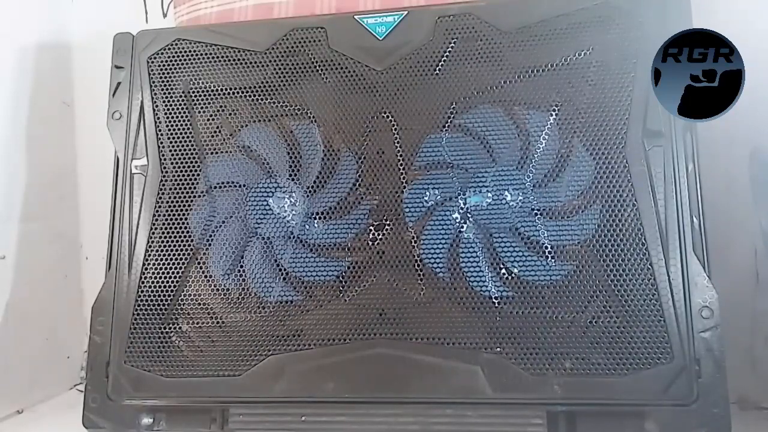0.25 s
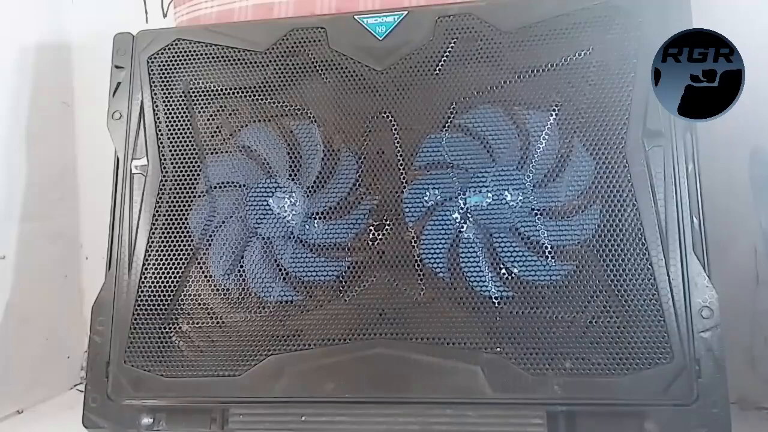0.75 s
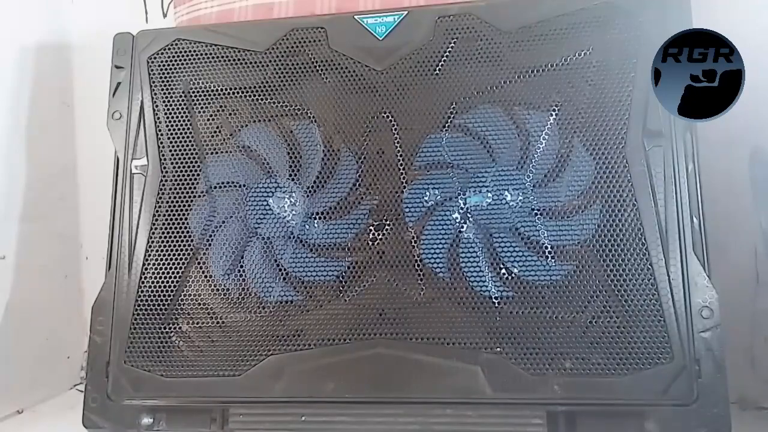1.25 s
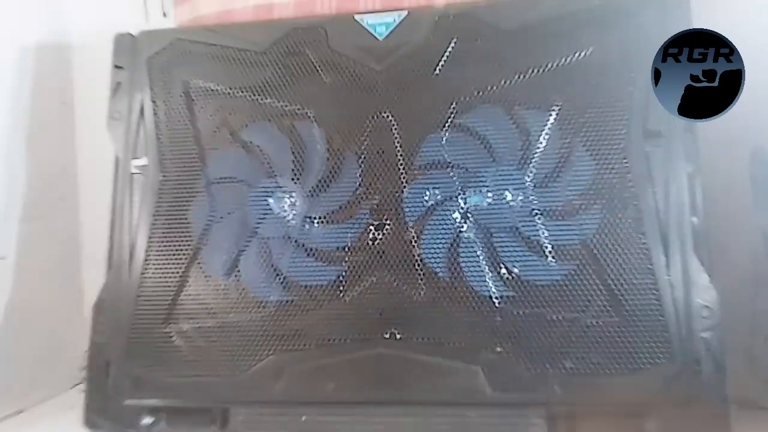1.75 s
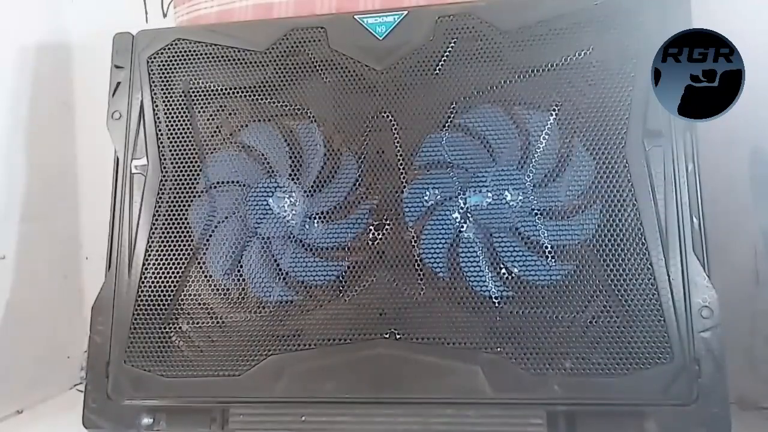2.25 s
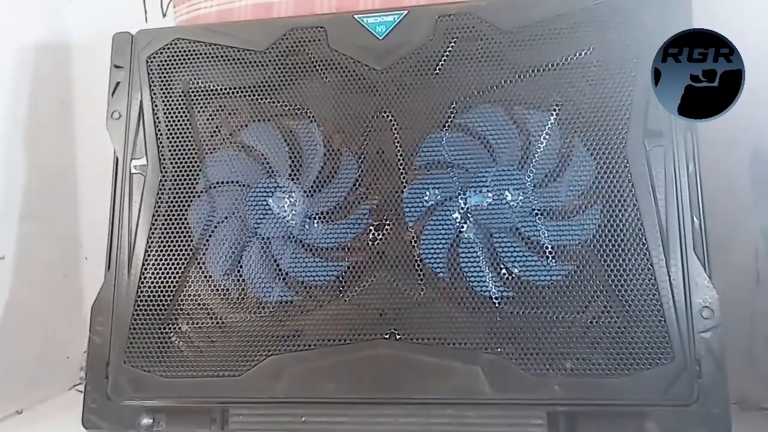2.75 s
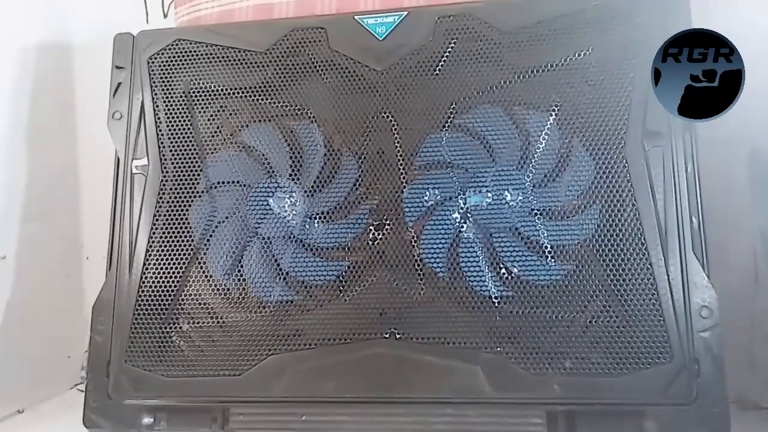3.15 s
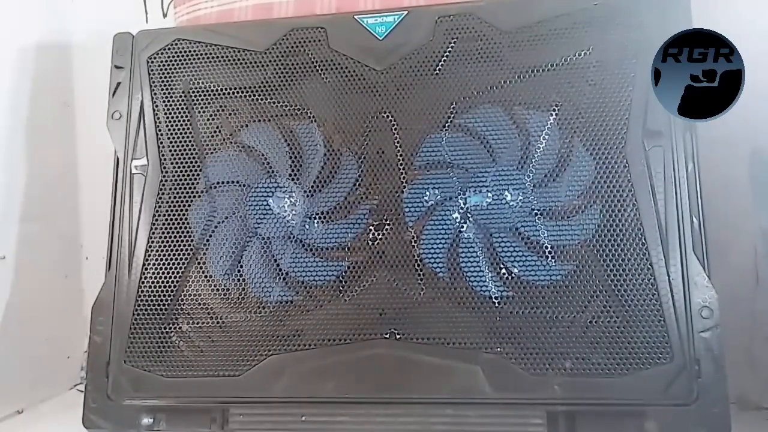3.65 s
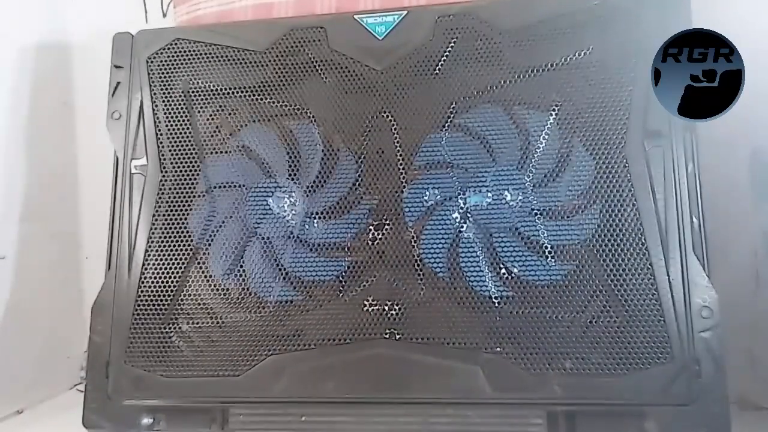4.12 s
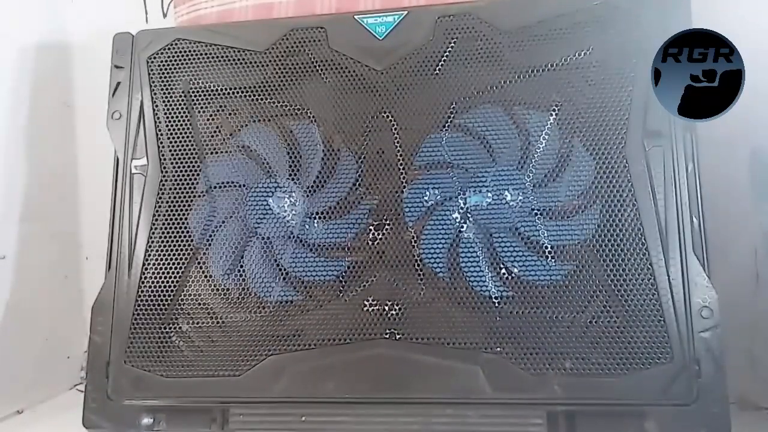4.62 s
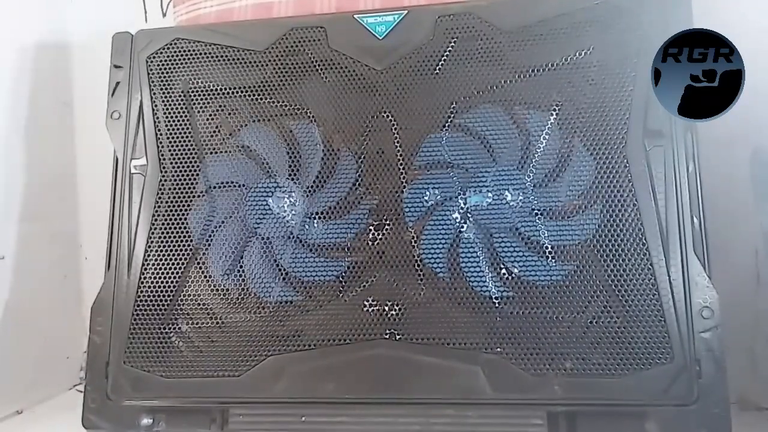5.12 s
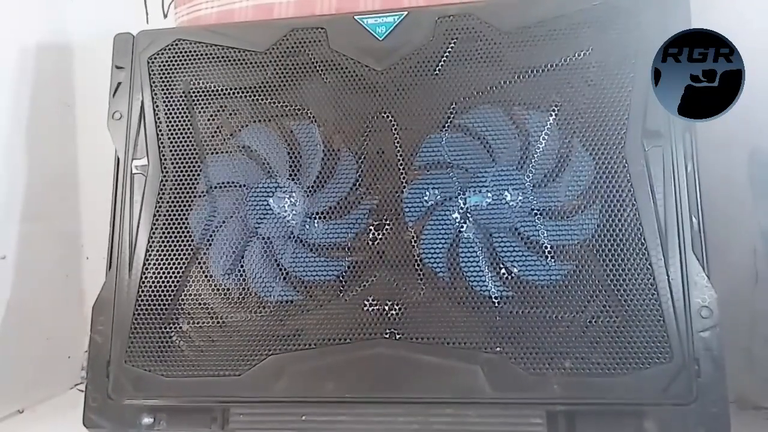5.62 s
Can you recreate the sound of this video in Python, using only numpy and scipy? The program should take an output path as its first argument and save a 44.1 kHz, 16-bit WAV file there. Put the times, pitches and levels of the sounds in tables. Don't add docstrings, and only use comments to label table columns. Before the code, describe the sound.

A bare, hard indoor room heard through a close phone microphone: soft low air, hiss and a faint, buzzing high electronic whine. Tiny handling ticks come at 0.8 and 1.3 s. At 1.65 s, just after a small hammer tick, a gas pellet rifle fires two shots about 0.07 s apart, each a harsh blast followed instantly by a strike ringing steel mesh, overloading the microphone with wind thumps. Loud rebounds crack at 1.9-2.0 s; pellets skip and rattle over the panel until 2.7 s, some sharply near 2.35 s, while it rocks with low knocks. Small bounces fade by 3.3 s. A tick at 3.8 s precedes a second double shot at 3.95 s, duller in its ring. Pellets click brightly on tile at 4.37 s, knock hollowly on a wooden shelf at 4.35 and 4.47 s, then bounce and skitter on tiles from 4.75 s, gradually weakening to the end, with short bright echoes.

```python
import sys
import numpy as np
from scipy import signal
from scipy.fft import rfft, irfft, next_fast_len
from scipy.io import wavfile

SR = 44100
rng = np.random.default_rng(int(sys.argv[2]) if len(sys.argv) > 2 else 0)


def generate_wav(signal):
    frames = np.transpose(np.atleast_2d(signal))
    scaled = np.clip(frames, -1, 1) * 32767
    pcm = np.round(scaled).astype(np.int16)
    wavfile.write(sys.argv[1], SR, pcm)


def rack_gain(trim_db):
    fader = np.asarray(trim_db, float)
    return 10 ** (fader / 20)


N = 259263

# t/s, strength/dB, hammer tick level/dB
TRIGGER_PULLS = [
    (1.653, -3.5, -23),
    (3.946, -3, -16.5),
]
# f/Hz, width/Hz, level/dB
PANEL_RINGS = [(200, 58, -7.5), (493, 230, -1), (757, 240, 4.5), (1010, 460, 2.5), (1550, 300, 1.5),
               (2430, 680, -3)]
# f/Hz, width/Hz, level/dB
FLOOR_RINGS = [(170, 107, -4), (418, 142, 9), (786, 305, 11.5), (1340, 350, 17.5), (2060, 1270, -3)]
# f/Hz, level/dB
TILE_CRACK = [(200, -16), (700, -12.5), (1800, -4.5), (3500, -2.5), (6000, -2.5), (8000, -3.5),
              (10000, -12.5), (16000, -31.5)]


def unit(x):
    return x / np.sqrt(np.mean(x ** 2) + 1e-20)


def along(points, hz):
    f, v = np.transpose(points)
    return np.interp(np.log(hz + 1), np.log(f + 1), v)


def curves(rows, **ends):
    s, *cols = np.transpose(rows)
    return [np.interp(np.arange(N) / SR, s, c, **ends) for c in cols]


def causal(points, size):
    level = rack_gain(along(points, np.fft.rfftfreq(size, 1 / SR)))
    ceps = irfft(np.log(level + 1e-6), size)
    ceps[1:size // 2] *= 2
    ceps[size // 2 + 1:] = 0
    return np.exp(rfft(ceps))


def coloured(x, points):
    m = next_fast_len(len(x) + 8192)
    return irfft(rfft(x, m) * causal(points, size=m), m)[:len(x)]


def resonances(modes, f, count, scatter_db):
    strength = rack_gain(scatter_db * rng.standard_normal((count, len(modes), 1)))
    total = 0
    for k, (hz, width, db) in enumerate(modes):
        ring = rack_gain(db) * 1j * f * width / (hz * hz - f * f + 1j * f * width)
        total = total + (-1) ** k * strength[:, k] * ring
    return total


def tails(count, size):
    # f/Hz, time to fall 60 dB t/s
    decay = [(150, 0.26), (700, 0.64), (2500, 0.52), (6000, 0.48), (8500, 0.36), (11000, 0.48),
             (15000, 0.59)]
    hz, t, z = signal.stft(rng.standard_normal((count, size)), SR, nperseg=256)
    fading = z * rack_gain(-60 * t / along(decay, hz)[:, None])
    tail = signal.istft(fading, SR, nperseg=256)[1][:, :size]
    t = np.arange(size) / SR
    tail = tail * (1 - np.exp(-t / 0.004)) ** 2
    return tail / np.linalg.norm(tail, axis=1, keepdims=True)


def contacts(rows, room_db, drier, rattle_ms, longer, body_db=0, top_db=0, late_s=0):
    rows = np.array(rows)[:, :4] + [late_s, 0, body_db, top_db]
    loud_db = np.maximum(rows[:, 1], rows[:, 2]) + 15
    return np.c_[rows, room_db - drier * loud_db, rattle_ms * rack_gain(longer * (rows[:, 1] + 15))]


def hits(rows, rings, click_ms, scatter_db, ring_db, body_room_db, top_room_db,
         crack=None, spot_hz=3000, spot_db=-40):
    # f/Hz, level/dB
    mic_tone = [(40, -18), (150, 1), (600, -5.5), (2500, -2.5), (4500, -1), (6000, 0.5), (7200, -4),
                (8600, -12.5), (12000, -18.5), (16000, -45)]
    # f/Hz, width/Hz, level/dB
    mesh_rings = [(2720, 690, -14), (3498, 180, 14), (4443, 290, -13.5), (5980, 110, 6), (7970, 230, -7.5)]
    # f/Hz, level/dB
    steel_crack = [(200, -24), (700, -7.5), (1800, -0.5), (8000, 0.5), (10000, -11.5), (16000, -37.5)]
    # f/Hz, level/dB
    top_tone = [(3000, -42.5), (7500, -10.5), (9500, -3.5), (13000, -3.5), (16000, -12.5), (21000, -30)]
    s, steel_db, body_db, top_db, room_db, rattle_ms = (c[:, None] for c in np.transpose(rows))
    count, size = len(s), 32768
    t, f = np.arange(size) / SR, np.fft.rfftfreq(size, 1 / SR)

    rattle_ms = np.maximum(rattle_ms, 0.5)
    click = click_ms / rattle_ms
    short = t[:size // 8]
    spikes = rng.standard_normal((count, len(short))) * rng.exponential(size=(count, len(short)))
    contact = spikes * np.exp(-short * 1000 / rattle_ms) * (1 - np.exp(-short * 2000))
    touching = rng.standard_normal((count, 128)) * np.exp(-t[:128] / 0.0006)
    contact[:, :128] += 0.3 * click * touching
    contact[:, :1] = click
    contact /= np.linalg.norm(contact, axis=1, keepdims=True)
    direct = rfft(contact, size)

    mic = causal(mic_tone, size=size)
    body = resonances(rings, f, count, scatter_db) * mic
    spot_width = spot_hz / 7
    spot = 1j * f * spot_width / (spot_hz ** 2 - f * f + 1j * f * spot_width)
    mesh = resonances(mesh_rings, f, count, 2.9 * scatter_db)
    steel = 1 + rack_gain(spot_db) * spot + rack_gain(ring_db) * mesh
    steel = steel * causal(steel_crack if crack is None else crack, size=size) * mic
    top = causal(top_tone, size=size)

    walls = rfft(tails(count, size=size))
    room = rack_gain(room_db) * walls
    other = rack_gain(room_db) * np.roll(walls, 1, axis=0)
    layers = [(steel_db + 1.0, steel, room),
              (body_db + 2.5, body, rack_gain(body_room_db) * other),
              (top_db + 5.5, top, rack_gain(top_room_db) * room)]
    sound = 0
    for db, colour, wet in layers:
        peak = np.abs(irfft(direct * colour, size)).max(axis=1, keepdims=True)
        sound = sound + rack_gain(db) / peak * colour * (direct + wet)
    fade = np.clip(10 * (t[-1] - t - 0.03), 0, 1)
    out = np.zeros(N + size)
    for start, one in zip(s[:, 0], irfft(sound, size) * fade):
        out[round(start * SR):][:size] += one
    return out[:N]


def room_air():
    # t/s, level/dB
    air_level = [(0, -68), (.4, -66), (.8, -66), (1.2, -66), (1.6, -68.5), (3.4, -62.5), (3.55, -71.5),
                 (3.75, -66.5), (5.87, -64)]
    # f/Hz, level/dB
    air_tone = [(18, -42.5), (30, -22.5), (65, -9), (129, -6), (269, -0.5), (900, -7.5), (1950, -27),
                (3300, -55.5)]
    # f/Hz, level/dB
    hiss_tone = [(900, -25.5), (1500, -0.5), (7000, -4.5), (9000, -6.5), (11000, -2), (16000, 2)]
    # from t/s, to t/s
    gate_open = [
        (1.649, 3.45),
        (3.94, 6),
    ]
    t = np.arange(N) / SR
    low_db = curves(air_level)[0]
    hiss_db = -63.5 + 5 * sum((t > a) & (t < b) for a, b in gate_open)
    low = coloured(rng.standard_normal(N), air_tone)
    rustle = coloured(rng.standard_normal(N), [(500, -34.5), (1200, -1.5), (7000, -7), (8800, -19)])
    hiss = coloured(rng.standard_normal(N), hiss_tone)
    rustle_db = 0.46 * (low_db + 73) - 68.5
    return rack_gain(low_db + 5.0) * unit(low) + rack_gain(rustle_db) * unit(rustle) + rack_gain(hiss_db) * unit(hiss)


def screen_whine():
    refresh_hz = 60
    cycle = (np.arange(N) / SR - 0.0018) * refresh_hz
    frame = np.floor(cycle + 1).astype(int)
    pitch, phase, level = rng.standard_normal((frame.max() + 1, 3))[frame].T
    gate = np.clip(5.2 * np.sin(np.pi * cycle) ** 2 - 0.3, 0, 1)
    tone = np.sin(2 * np.pi * (7870 + 30 * pitch) * (cycle % 1) / refresh_hz + 3 * phase)
    ticks = coloured(np.diff(frame, prepend=0.), [(3000, -26.5), (6100, -5.0), (6900, 7.5), (7500, -14.0),
                                                  (8500, 0.5), (9000, -31)])
    return rack_gain(-66 + 2.5 * level) * gate * tone + rack_gain(-75) * unit(ticks)


def small_ticks(rows):
    return hits(rows, PANEL_RINGS, 0.87, 0.6, ring_db=-7.5, body_room_db=-3.5, top_room_db=-11)


def handling():
    # t/s, steel peak level/dB, body level/dB, top level/dB
    touches = [
        (0.8344, -50, -48, -63),
        (1.3423, -45.5, -50.5, -86.5),
        (3.7802, -34, -62.5, -68.5),
    ]
    return small_ticks(contacts(touches, room_db=6.5, drier=0, rattle_ms=4.9, longer=0))


def hammer():
    return small_ticks([(s - 0.015, db, db - 20, db - 26.5, 8, 3) for s, _, db in TRIGGER_PULLS])


def double_shots():
    # steel peak level/dB, body level/dB, top level/dB, room level/dB, rattle t/ms
    blast = (23, 7.5, 5, 1, 17)
    # steel peak level/dB, body level/dB, top level/dB, room level/dB, rattle t/ms
    strike = (29.5, 18.5, 17, -2, 4)
    # f/Hz, width/Hz, level/dB
    centre_rings = [(250, 290, -14), (756, 260, -2.5), (1490, 170, 3.5), (2500, 900, -7.5)]
    # f/Hz, width/Hz, level/dB
    edge_rings = [(248, 180, -8.5), (870, 2100, -2.5), (2300, 2200, -0.5)]
    cycle_s, flight_s = 0.0712, 0.0173
    bursts = []
    for s, db, _ in TRIGGER_PULLS:
        rows = []
        for shot in range(2):
            for late, (steel, body, top, room, ms) in ((0, blast), (flight_s, strike)):
                rows.append((s + shot * cycle_s + late, steel + db, body + db, top + db, room, ms))
        bursts.append(rows)
    first = hits(bursts[0], centre_rings, 15, 0.92, ring_db=-18.5, body_room_db=0.0, top_room_db=-20.0)
    second = hits(bursts[1], edge_rings, 20, 0.82, ring_db=-15, body_room_db=0.5, top_room_db=-22.5)
    return first + second


def air_pushes():
    # t/s, level/dB, f/Hz
    pushes = [
        (1.736, -1.5, 45),
        (1.754, -22, 39.85),
        (1.876, 0.5, 170),
        (2.012, -12.5, 200),
        (2.357, -33, 52.3),
        (3.96, -11, 46.9),
        (4.03, -28, 45.1),
        (4.345, -37, 190),
        (4.249, -39, 60),
    ]
    t = np.arange(N) / SR
    out = np.zeros(N)
    for s, db, hz in pushes:
        turn = np.maximum(t - s, 0) * 2 * np.pi * hz
        out += rack_gain(db + 10.0) * turn * (1 - turn / 2) * np.exp(-turn)
    return out


def rebounds():
    # t/s, steel peak level/dB, body level/dB, top level/dB
    returns = [
        (1.8761, 10, -6, -5),
        (1.9054, 3.5, -36.5, -13),
        (1.9374, -7, -18, -43.5),
        (2.0014, -4.5, -2, -26),
    ]
    return hits(contacts(returns, room_db=-5.5, drier=0, rattle_ms=3.5, longer=0), PANEL_RINGS, 12, 1.5,
                ring_db=-9, body_room_db=-0.5, top_room_db=-16.5)


def rocking():
    # t/s, level/dB
    sway = [(1.95, -41), (2.018, -26), (2.086, -46), (2.386, -58), (2.748, -42.5), (2.832, -39.5),
            (2.978, -62.5), (3.278, -60), (3.6, -81)]
    roll_db, roll_fade_db_per_s = -39, 23.5
    knock_db, = curves(sway, left=-120, right=-120)
    since = np.arange(N) / SR - sway[0][0]
    roll = rack_gain(roll_db - roll_fade_db_per_s * since - 25) * (knock_db > -120)
    chance = rng.random((2, N))
    knocks = rng.standard_normal(N) * (0.07 + 8 * (chance[0] < 150 / SR))
    ticks = rng.standard_normal(N) * (1 + 3 * (chance[1] < 300 / SR))
    low = coloured(knocks, [(60, -34), (100, -32), (140, 8.0), (450, 4), (1000, 0), (2500, -27.5), (6000, -83.5)])
    fine = coloured(ticks, [(500, -30), (2000, -3), (6000, 0), (8500, -14), (12000, -40)])
    return rack_gain(knock_db + 4.0) * unit(low) + roll * unit(fine)


def skips():
    # t/s, steel peak level/dB, body level/dB, top level/dB, ring of the spot f/Hz
    touches = [(2.0662, -21, -27, -58, 1560), (2.0838, -24, -24.5, -52, 1590),
               (2.1015, -20.5, -15, -41, 1340), (2.172, -14.5, -21.5, -41, 1220),
               (2.2228, -15.5, -27.5, -46, 1450), (2.2442, -19, -34, -38, 1430),
               (2.2603, -14.5, -34.5, -51, 1850), (2.3018, -29, -23.5, -42, 1630),
               (2.3075, -6.5, -25, -52, 2440), (2.3561, -1, -25.5, -26, 1580),
               (2.3657, 3, -28.5, -23, 2440), (2.4472, -12, -25, -40, 2130), (2.4779, -20, -32, -46, 2360),
               (2.5309, -11.5, -21.5, -51, 1290), (2.5816, -20, -32, -60, 1990),
               (2.5932, -33, -30.5, -58, 1480), (2.612, -29, -24, -49, 1430),
               (2.6333, -11.5, -23.5, -55, 2065), (2.6507, -38, -30, -50, 1300),
               (2.6737, -13.5, -23.5, -61, 1870), (2.7205, -23, -25.5, -64, 1310)]
    rows = contacts(touches, room_db=-7, drier=0.024, rattle_ms=5.3, longer=0.27,
                    body_db=8, top_db=3.5, late_s=0.00079)
    return hits(rows, PANEL_RINGS, 40, 2.2, ring_db=-23, body_room_db=1.0, top_room_db=-2.0,
                spot_hz=np.array(touches)[:, 4:], spot_db=10.5)


def skids():
    # t/s, steel peak level/dB, body level/dB, top level/dB, ring of the
    # spot f/Hz
    glances = [(2.324, -3.5, -25, -28.5, 5850), (2.36, -7.5, -22, -32, 5560), (4.384, -11, -42, -40, 6440),
               (5.149, -26, -60, -60, 3430), (4.9864, -20.5, -53, -38.5, 5830),
               (5.1567, -17, -55, -52, 6050), (5.180, -30, -62, -60, 3400), (5.3847, -29.5, -55, -64, 4990),
               (5.4176, -28, -39, -56, 5700), (5.5558, -25.5, -64, -61, 6600),
               (5.7558, -26, -52, -62, 4150)]
    return hits(contacts(glances, room_db=-8, drier=0.66, rattle_ms=7.3, longer=0), FLOOR_RINGS, 3, 1.6,
                ring_db=-25, body_room_db=-1, top_room_db=-4, crack=TILE_CRACK,
                spot_hz=np.array(glances)[:, 4:], spot_db=-1.5)


def dribble():
    # t/s, steel peak level/dB, body level/dB
    drops = [(2.7475, -28, -26), (2.7794, -30, -39), (2.8139, -32, -20), (2.8622, -25, -25),
             (2.9054, -39, -19.5), (2.9684, -29, -29.5), (3.019, -36.5, -53), (3.037, -33, -66),
             (3.069, -53, -61), (3.0905, -37.5, -66), (3.1063, -35, -67), (3.1286, -38, -66),
             (3.1623, -50, -30.5), (3.1807, -36.5, -55), (3.2116, -40, -37.5), (3.2302, -44.5, -46),
             (3.2914, -44, -44)]
    # f/Hz, width/Hz, level/dB
    frame_rings = [(370, 150, -8.5), (698, 94, -2), (940, 180, -1.5), (1300, 370, -8), (2380, 1300, -24.5)]
    rows = [(s, steel_db, body_db, steel_db - 35.5) for s, steel_db, body_db in drops]
    return hits(contacts(rows, room_db=-9.5, drier=0.27, rattle_ms=7.2, longer=0.044), frame_rings, 40, 2.2,
                ring_db=-6.5, body_room_db=-2.5, top_room_db=-9.5)


def shelf_knocks():
    # t/s, steel peak level/dB, body level/dB, top level/dB
    knocks = [
        (4.3457, -19, -5, -35),
        (4.4695, -19, -11, -37),
        (5.1465, -45, -28, -48),
    ]
    # f/Hz, width/Hz, level/dB
    shelf_rings = [(200, 280, -6.5), (640, 350, 2), (1130, 850, 2), (1850, 900, -0.5), (2450, 870, -6.5)]
    return hits(contacts(knocks, room_db=-2, drier=0, rattle_ms=5.8, longer=0), shelf_rings, 64, 0.24,
                ring_db=-20, body_room_db=-6.5, top_room_db=-7)


def tile_bounces():
    # t/s, steel peak level/dB, body level/dB, top level/dB, ring of the spot f/Hz
    bounces = [(4.3707, 2, -31, -24.5, 6300), (4.7549, -16.5, -32, -52, 5920),
               (4.7586, -10.5, -31, -40, 4220), (4.786, -1, -40, -31, 5940),
               (4.9722, -15.5, -36, -44, 5820), (5.079, -4, -56, -35.5, 6000),
               (5.2789, -12, -33.5, -45, 6000), (5.449, -13, -43, -47, 5940), (5.5896, -18, -45, -66, 3700),
               (5.6839, -16, -45, -52, 2160), (5.7722, -24, -45, -60, 5530), (5.8322, -19, -43, -54, 5400)]
    rows = contacts(bounces, room_db=-1.5, drier=0.38, rattle_ms=7.6, longer=0,
                    body_db=5, top_db=3.5, late_s=0.00078)
    return hits(rows, FLOOR_RINGS, 130, 1.3, ring_db=-7.5, body_room_db=0, top_room_db=4, crack=TILE_CRACK,
                spot_hz=np.array(bounces)[:, 4:], spot_db=0.5)


def scene():
    phone_and_room = room_air() + screen_whine() + air_pushes()
    rifle = handling() + hammer() + double_shots()
    panel = rebounds() + rocking() + skips() + dribble()
    shelf_and_tiles = skids() + shelf_knocks() + tile_bounces()
    return (phone_and_room + rifle + panel + shelf_and_tiles)[None]


def roll_off(x):
    return signal.sosfilt(signal.butter(12, 16330, fs=SR, output="sos"), x)


def record(dry):
    # f/Hz, level/dB
    treble_cut = [(7000, -1.5), (9000, -2), (15740, -7), (15900, -56)]
    keep = np.exp(-1 / (0.1 * SR))
    power = signal.lfilter([1 - keep], [1, -keep], dry ** 2)
    x = dry * (1 + power / rack_gain(-3.5)) ** -0.2
    x = x / (1 + np.abs(x / 0.97) ** 4) ** (1 / 4)
    mix = np.clip(coloured(x[0], treble_cut), -1, 1)[None]
    return roll_off(mix)


dry = scene()
out = record(dry)
generate_wav(out)
```